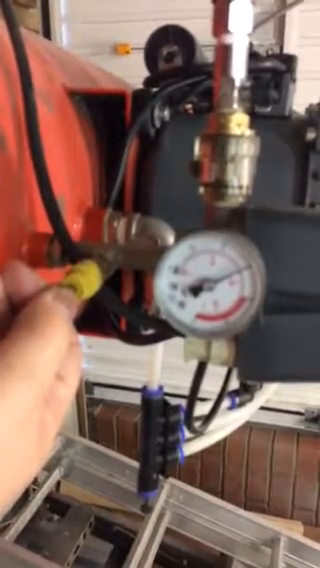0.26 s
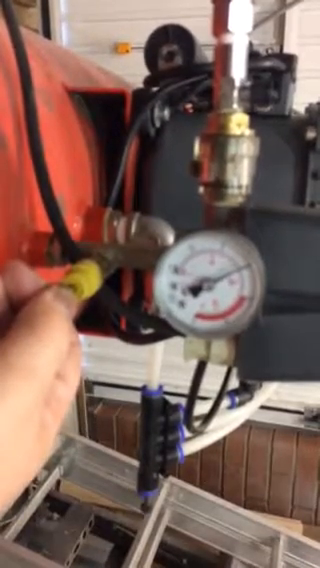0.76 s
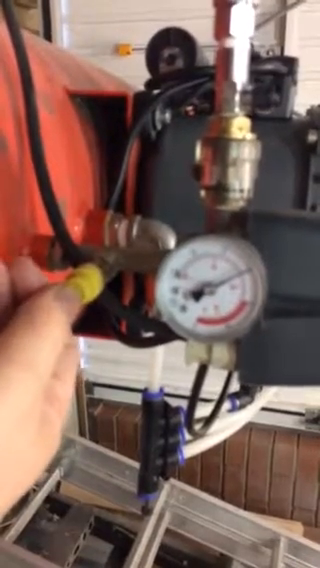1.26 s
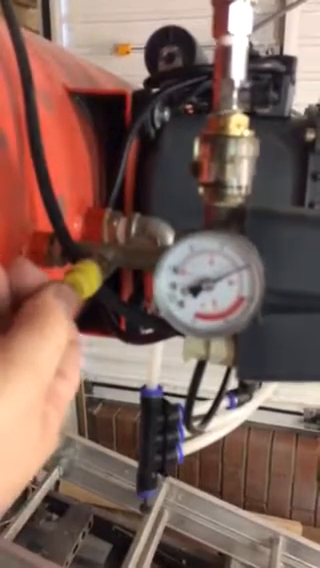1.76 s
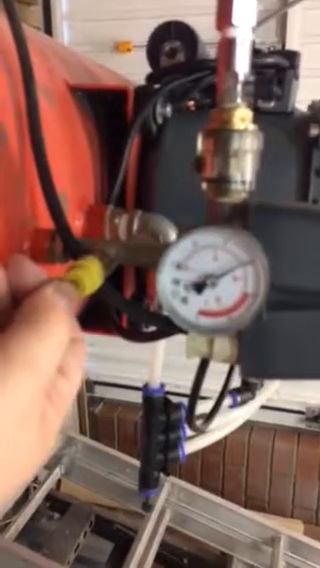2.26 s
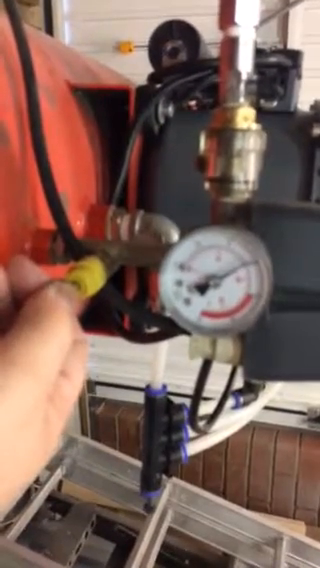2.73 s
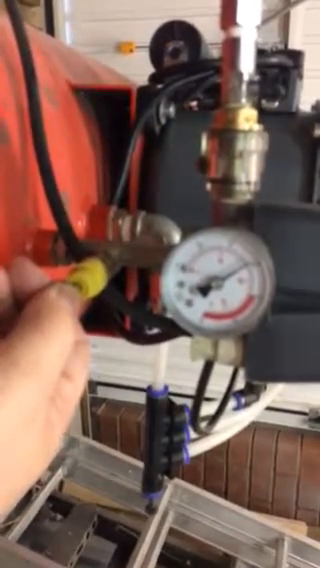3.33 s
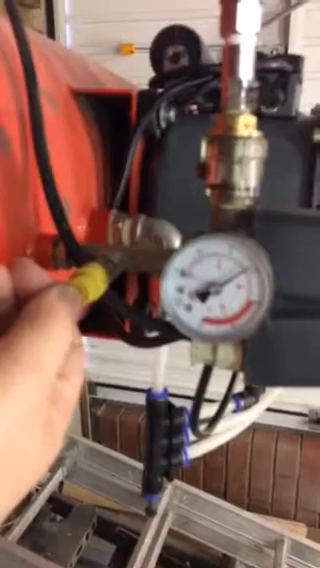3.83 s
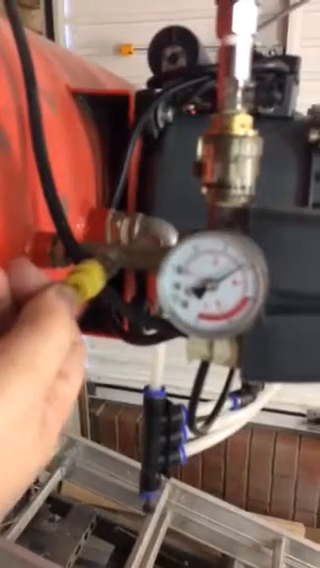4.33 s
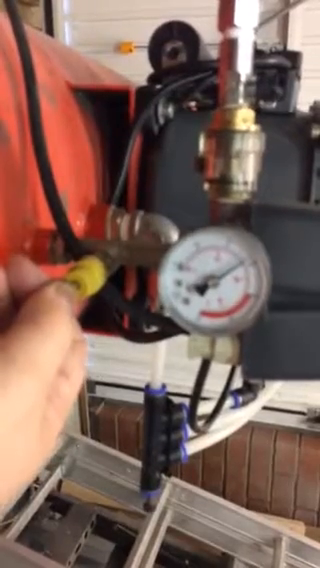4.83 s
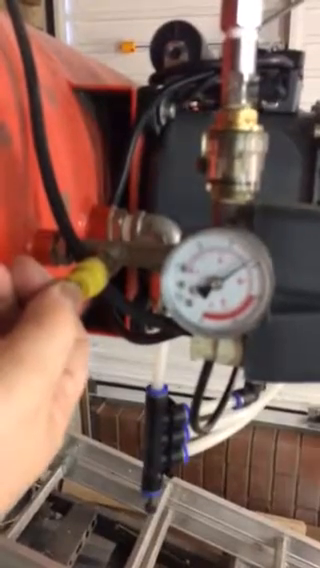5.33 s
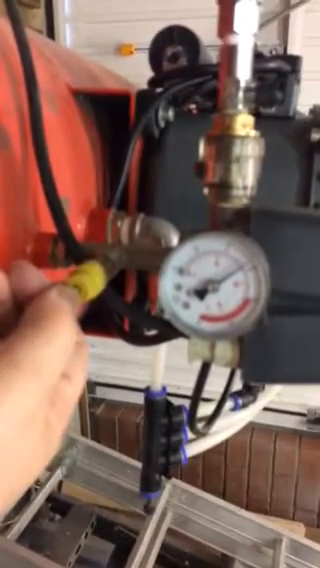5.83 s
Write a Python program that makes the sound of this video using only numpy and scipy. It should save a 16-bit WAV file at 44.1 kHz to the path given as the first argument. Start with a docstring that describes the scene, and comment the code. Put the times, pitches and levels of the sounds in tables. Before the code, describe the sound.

Air is already roaring from the safety valve of a compressor tank, close to the microphone in a garage. It cuts off abruptly, leaving a faint low drone and soft rush. The valve is pulled three more times: each time a brief, thin leak leads into a puff and a loud hissing blast. The two middle blasts snap shut with a soft thump, and the last begins just at the end.

```python
"""The safety valve of an air compressor tank, pulled by hand four times in a garage.
The first turbulent jet is already roaring at the start. Before each later one, air seeps past the
seat; then the valve pops open with a puff and the jet roars until it snaps shut.
Automatic gain control ducks the blasts; the room's soft rush and low drone swell back between them."""
import sys
import numpy as np
from scipy import signal
from scipy.fft import rfft, irfft
from scipy.io import wavfile
from scipy.ndimage import minimum_filter1d

SR = 44100
rng = np.random.default_rng(int(sys.argv[2]) if len(sys.argv) > 2 else 0)


def wrap_up_sound(samples):
    """Save the sound to the file named by the first command line argument, as 16-bit audio."""
    columns = np.atleast_2d(samples).T
    # keep every value between -1 and 1, then stretch to whole-number steps
    tamed = np.clip(columns, -1, 1)
    steps = np.round(tamed * 32767).astype(np.int16)
    wavfile.write(sys.argv[1], SR, steps)


N = 268569

# Lifts of the valve: open_s, shut_s, level_db, treble_db
VALVE_LIFTS = [(-.1, 0.928, -6.5, 0.5), (2.0195, 3.574, -4.5, 1), (4.477, 5.276, -4, 1),
               (5.94, 6.3, -7, 0.2)]
# Spectral density of the jet: frequency_hz, level_db
JET_SPECTRUM = [(15, -40.5), (30, -17), (58, -7.5), (110, -4), (190, -2.5), (270, -6.5), (420, -0.5),
                (590, 0.9), (1200, -2.5), (3000, -3.5), (7000, -6), (10000, -8.5), (12500, -10),
                (15300, -14.5)]
# Reverberation of the garage: frequency_hz, level_db, t60_s
GARAGE_REVERB = [(60, -28.5, 0.29), (200, -24, .23), (700, -28.5, 0.42), (1970, -13.5, .28),
                 (4970, -18, 0.3), (10000, -12, 0.25), (14980, -15, 0.21)]
# Spectral density of the room's drone: frequency_hz, level_db
DRONE_SPECTRUM = [(20, -16), (32, -5.5), (43, 3), (65, 0.5), (100, -3), (140, -4.5), (190, 0), (245, -10.5),
                  (330, -23), (600, -42.5)]
# Spectral density of the room's rush: frequency_hz, level_db
RUSH_SPECTRUM = [(150, -23), (290, -4), (350, -10), (450, -5), (560, -7.5), (750, -6.5), (1100, -7.5),
                 (1800, -12.5), (2700, -22), (4000, -32), (8000, -37), (15300, -48)]
# Flow past the seat before each lift but the first: crack_s, leak_db, rise_s, weep_db
SEAT_LEAKS = [(1.982, -39.5, 0.006, -61.5), (4.432, -36.5, 0.011, -73), (5.864, -42.5, 0.011, -90)]
# Spectral density of the leak's hiss: frequency_hz, level_db
LEAK_SPECTRUM = [(600, -19), (2700, -11), (5000, -18), (7500, -5), (12000, 1.5), (15000, -10.5)]
# Puffs of air as the valve pops or shuts: peak_s, level_db, pitch_hz
VALVE_PUFFS = [(2.02, -10.0, 78.9), (3.573, -6.5, 70), (4.476, -9.5, 115), (5.278, -8, 74.4),
               (5.939, -11.5, 159)]


def from_db(db):
    """Amplitude ratio of a level in decibels."""
    return 10 ** (np.asarray(db) / 20)


def unit_rms(x):
    """Normalisation to unit mean square."""
    return x / np.sqrt(np.mean(x ** 2) + 1e-20)


def seconds():
    """Time of every sample."""
    return np.arange(N) / SR


def at_hz(points, hz, column=1):
    """Interpolation of a table column on a log-frequency axis."""
    table = np.array(points)
    return np.interp(np.log(np.maximum(hz, 1)), np.log(table[:, 0]), table[:, column])


def noise(spectrum):
    """Spectral shaping of white noise, rms 1."""
    hz = np.arange(N // 2 + 1) * SR / N
    return unit_rms(irfft(rfft(rng.standard_normal(N)) * from_db(at_hz(spectrum, hz)), N))


def drift(rate_hz):
    """Random modulation: straight lines between Gaussian values, rms 1."""
    knots = rng.standard_normal(N // 20)
    return unit_rms(np.interp(seconds() * rate_hz, np.arange(len(knots)), knots))


def butterworth(x, order, edges_hz, kind):
    """Filtering with a maximally flat passband."""
    return signal.sosfilt(signal.butter(order, edges_hz, kind, fs=SR, output="sos"), x)


def band_noise(low_hz, high_hz):
    """Band-limited noise, rms 1."""
    return unit_rms(butterworth(rng.standard_normal(N), 2, [low_hz, high_hz], "band"))


def resonance(hz, width_hz):
    """Response of one resonator driven by white noise, rms 1."""
    return unit_rms(signal.lfilter(*signal.iirpeak(hz, hz / width_hz, fs=SR), rng.standard_normal(N)))


def lag(x, time_s):
    """First-order relaxation towards the input."""
    keep = np.exp(-1 / (time_s * SR))
    return signal.lfilter([1 - keep], [1, -keep], x)


def attack(age, rise_s):
    """Exponential growth that reaches 1 at age zero and stays there."""
    return np.exp(np.minimum(age, 0) / rise_s)


def jet(opening_s=0.0029, closing_s=0.0055, build_s=0.075, build_db=4.5, eddy_db=1.0, flutter_db=0.83):
    """Turbulent jet noise: large eddies roar, small ones at the orifice hiss; the lift gates both."""
    t, flow = seconds(), noise(JET_SPECTRUM)
    treble = butterworth(flow, 1, edges_hz=4800, kind="high")
    roar = (flow - treble) * from_db(eddy_db * drift(rate_hz=45))
    hiss = treble * from_db(flutter_db * drift(rate_hz=25))
    out = np.zeros(N)
    for open_s, shut_s, level_db, treble_db in VALVE_LIFTS:
        lift = np.clip((t - open_s) / opening_s + 1, 0, 1) * np.clip((shut_s - t) / closing_s + .5, 0, 1)
        shortfall_db = build_db * np.exp(-np.maximum(t - open_s, 0) / build_s)   # flow takes time to build
        out += lift * from_db(level_db - shortfall_db) * (roar + from_db(treble_db) * hiss)
    return out


def garage(x, bands=9):
    """Diffuse-field reverberation: each octave's energy decays exponentially at its own rate."""
    out = np.zeros(N)
    edges_hz = np.geomspace(40, 16000, bands + 1)
    for low_hz, high_hz in zip(edges_hz, edges_hz[1:]):
        centre_hz = np.sqrt(low_hz * high_hz)
        decay_s = at_hz(GARAGE_REVERB, centre_hz, column=2) / np.log(10 ** 6)   # t60 to time constant
        energy = lag(butterworth(x, 2, [low_hz, high_hz], "band") ** 2, decay_s)
        out += from_db(at_hz(GARAGE_REVERB, centre_hz)) * np.sqrt(energy) * band_noise(low_hz, high_hz)
    return out


def drone(level_db=-56, dip_db=6, hold_s=.42, swell_s=.14, waver_db=0.5):
    """Amplitude-modulated low noise: it wavers, dips with each blast and swells back in the pause."""
    t = seconds()
    dips = [(t > open_s) * np.clip(1 - (t - shut_s - hold_s) / swell_s, 0, 1)
            for open_s, shut_s, *_ in VALVE_LIFTS]
    envelope_db = level_db - dip_db * np.max(dips, axis=0)
    return noise(DRONE_SPECTRUM) * from_db(envelope_db - waver_db * drift(rate_hz=18))


def room_rush(rush_db=-63.5, whine_db=-71):
    """Stationary noise: a broad band is heard as a soft rush, a narrow one as a faint, blurred whine."""
    return from_db(rush_db) * noise(RUSH_SPECTRUM) + from_db(whine_db) * resonance(990, width_hz=50)


def leak_flow(weep_lead_s=.143, weep_rise_s=.006, creep_db_per_s=108, give_db=6, give_s=0.014):
    """Flow grows with the gap: the seat weeps, cracks open, creeps wider and at last gives way."""
    t, flow = seconds(), np.zeros(N)
    for (crack_s, leak_db, rise_s, weep_db), (pop_s, *_) in zip(SEAT_LEAKS, VALVE_LIFTS[1:]):
        left_s = np.maximum(pop_s - t, 0)
        weep = from_db(weep_db) * attack(weep_lead_s - left_s, weep_rise_s)
        creep_db = creep_db_per_s * np.clip(t - crack_s, 0, pop_s - crack_s)   # the hand keeps pulling
        surge_db = give_db * np.exp(-left_s / give_s)   # the spring gives way
        leak = from_db(leak_db + creep_db + surge_db) * attack(t - crack_s, rise_s)
        flow += (weep + leak) * (t < pop_s)
    return flow


def seep(gain_db=-2.0, sputter_db=1.0, half_coupling_db=-44, whistle_gain=0.58):
    """Flow-excited resonance: a thin gap sputters and hisses; as it widens, the valve's bore whistles."""
    flow = leak_flow()
    bore = resonance(5900, width_hz=2800) + whistle_gain * resonance(4680, width_hz=220)
    coupling = flow / (flow + from_db(half_coupling_db))
    hiss = noise(LEAK_SPECTRUM) + coupling * bore
    return flow * hiss * from_db(gain_db - sputter_db * drift(rate_hz=250))


def puffs(swell_s=.0065, fade_s=0.0037, swirl_gain=0.49):
    """Pressure transients: a sudden change of flow sends one slow, swirling swing over the microphone."""
    eddies = band_noise(low_hz=40, high_hz=300)
    out = np.zeros(N)
    for peak_s, level_db, pitch_hz in VALVE_PUFFS:
        age = seconds() - peak_s
        envelope = np.exp(np.minimum(age / swell_s, -age / fade_s))
        out += from_db(level_db) * envelope * (swirl_gain * eddies - np.cos(2 * np.pi * pitch_hz * age))
    return out


def scene():
    """Superposition of valve and room at one microphone near the tank, the same in both channels."""
    valve = jet() + seep() + puffs()
    return np.tile(valve + garage(valve) + drone() + room_rush(), (2, 1))


def gain_control(x, threshold_db=-13.0, slope=0.72, hold_s=.275, release_db_per_s=200, overshoot=0.56):
    """Dynamic compression: gain drops on a loud sound, holds, then recovers, overshooting either way."""
    level_db = 10 * np.log10(lag(x[0] ** 2, time_s=0.0032) + 1e-12)
    wanted_cut_db = slope * np.maximum(level_db - threshold_db, 0)
    window = int(hold_s * SR)
    held_db = -minimum_filter1d(-wanted_cut_db, window, origin=(window - 1) // 2)   # deepest recent cut
    climb_db = release_db_per_s * seconds()
    cut_db = np.maximum.accumulate(held_db + climb_db) - climb_db   # limits the rate of recovery
    change_db = cut_db - cut_db[0]
    swing_db = overshoot * (change_db - lag(change_db, time_s=0.058))
    return x * from_db(-lag(cut_db + swing_db, time_s=.0006))


def record(dry, clip_level=.62, low_cut_hz=35, high_cut_hz=15350):
    """Compression, clipping of the rare highest peaks, then band-limiting of deep bass and top treble."""
    x = np.clip(gain_control(dry), -clip_level, clip_level)
    x = butterworth(x, 2, low_cut_hz, "high")
    return signal.sosfilt(signal.ellip(12, .1, 70, high_cut_hz, fs=SR, output="sos"), x)


dry = scene()
out = record(dry)
wrap_up_sound(out)
```